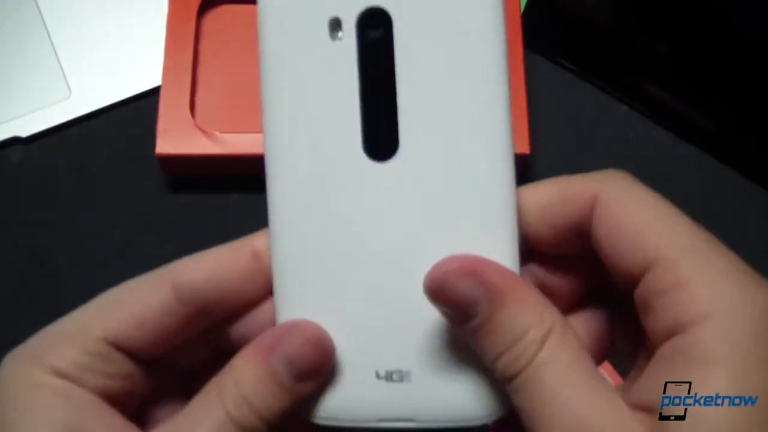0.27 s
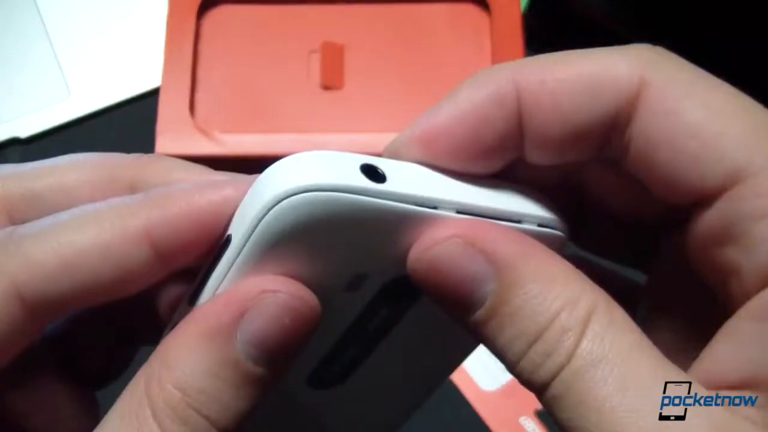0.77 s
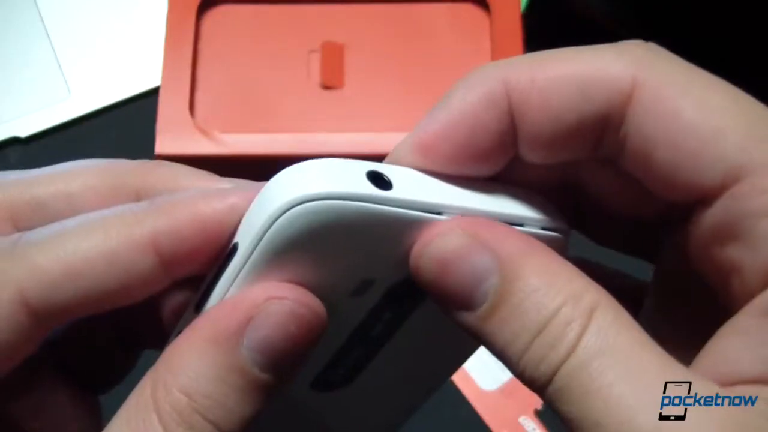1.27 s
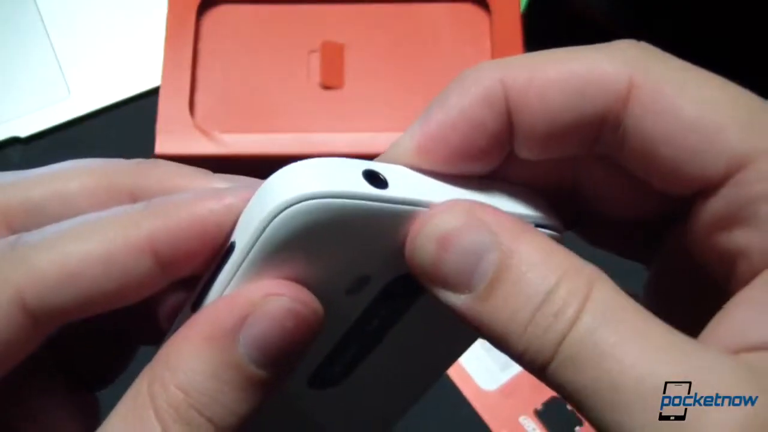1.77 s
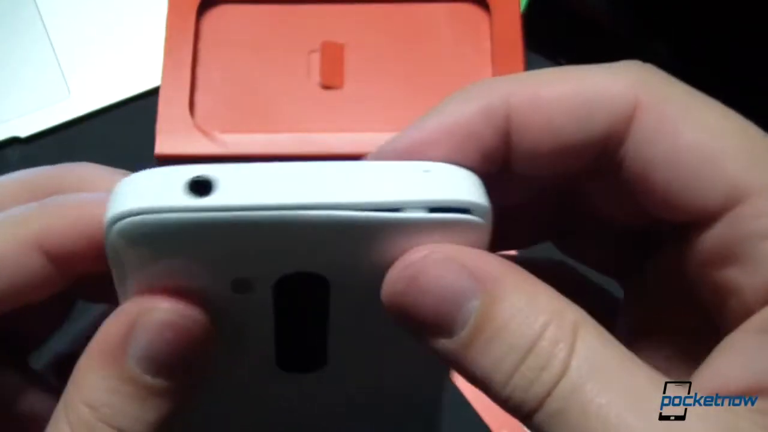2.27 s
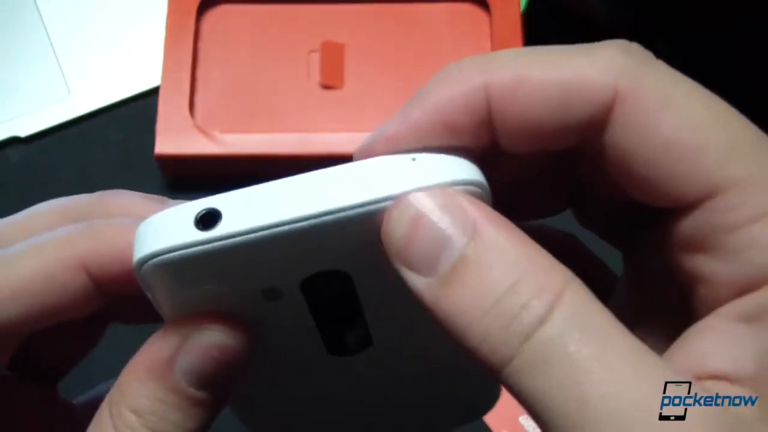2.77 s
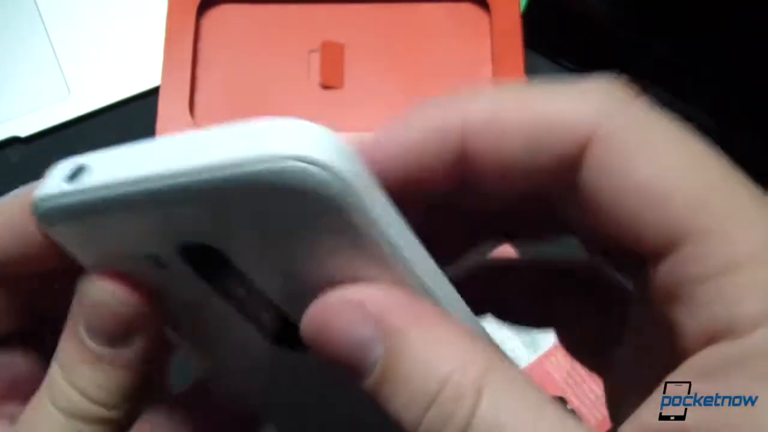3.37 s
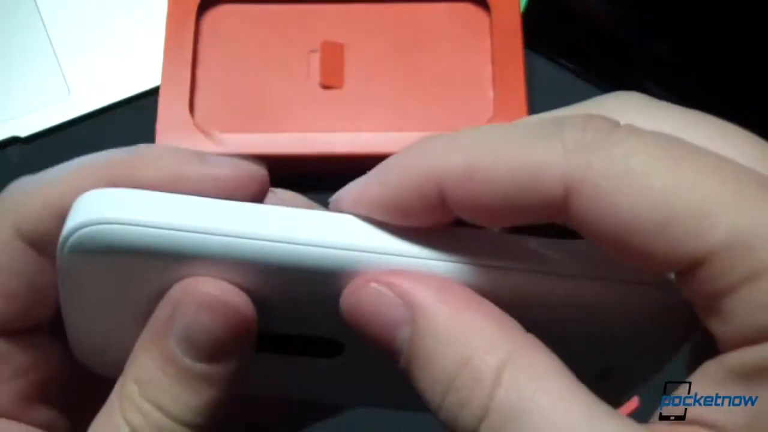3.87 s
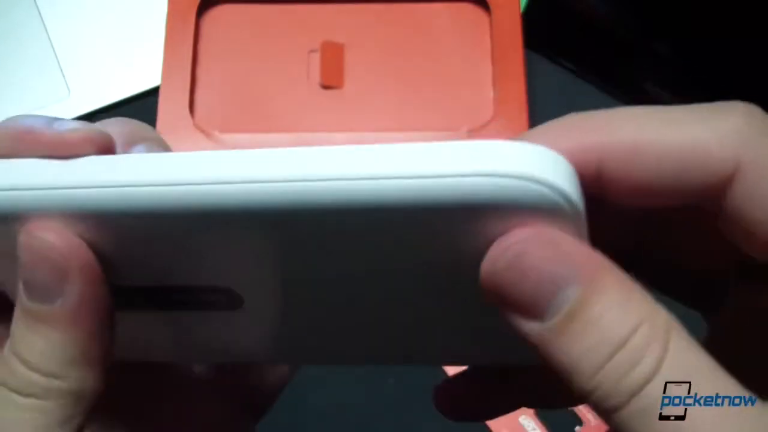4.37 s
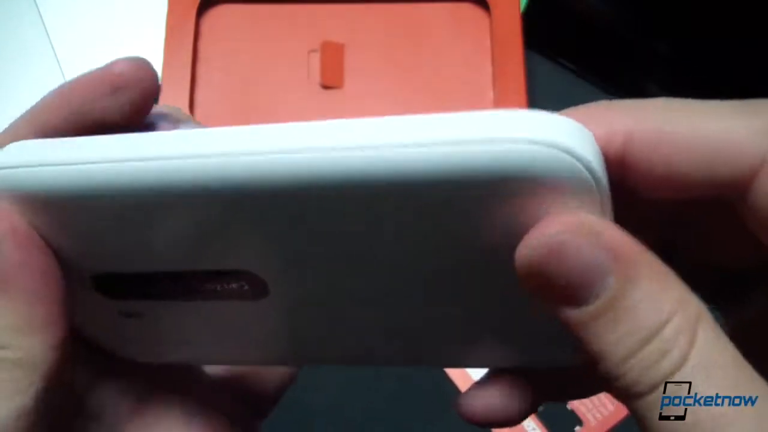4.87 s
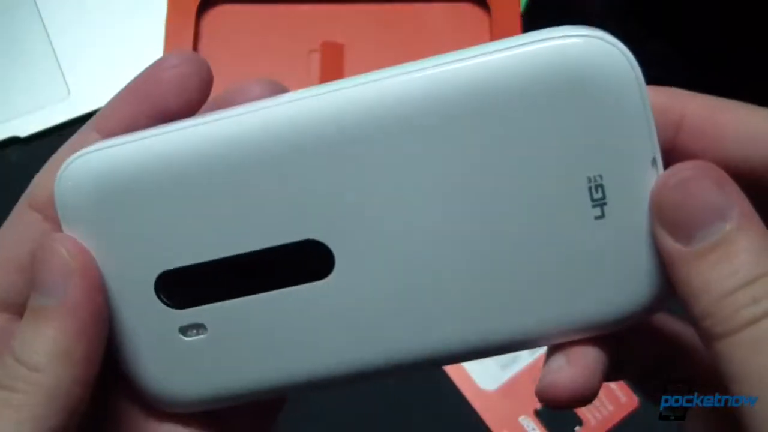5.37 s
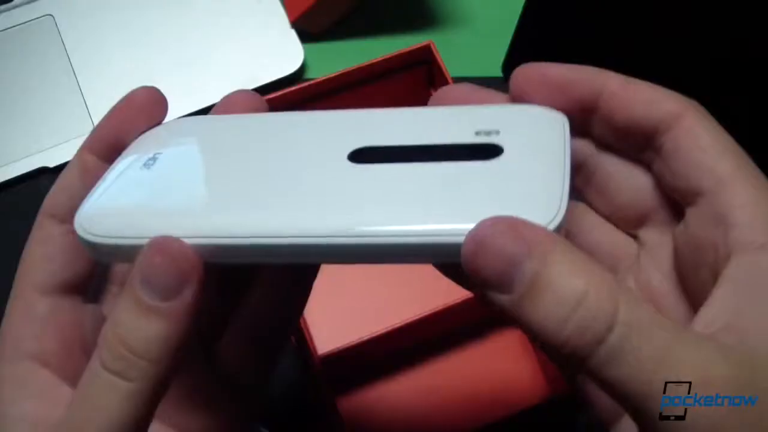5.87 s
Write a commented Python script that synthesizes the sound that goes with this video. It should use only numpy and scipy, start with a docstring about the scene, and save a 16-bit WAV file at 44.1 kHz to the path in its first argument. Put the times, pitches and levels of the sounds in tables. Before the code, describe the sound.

Three sharp plastic snaps of a phone cover seating under the thumbs, with faint ticks, soft finger bumps and a low hum between.

```python
"""Three catches of a plastic back cover slip and snap home on a phone: modes of the cover ring under noise cracks.
Between the snaps the shell ticks and creeps, exciting the same modes more softly, and a side key clicks.
Fingers slide, as noise grained by tiny slips, and bump, as low thuds; a small, dry room answers by convolution.
Beneath lie a wavering low hum, a brief drone and faint steady noise; the loudest peaks are rounded off."""
import sys
import numpy as np
from scipy import signal
from scipy.fft import rfft, irfft, next_fast_len
from scipy.io import wavfile
from scipy.ndimage import uniform_filter1d, map_coordinates

SR = 44100
rng = np.random.default_rng(int(sys.argv[2]) if len(sys.argv) > 2 else 0)


def dump_mix(stems):
    """Bounce the given channels to the path in sys.argv[1] as a 16-bit WAV at rate SR."""
    frames = np.atleast_2d(stems).T  # one column per channel
    limited = np.clip(frames, -1, 1)  # hard clip at full scale
    pcm = np.round(limited * 32767).astype(np.int16)
    wavfile.write(sys.argv[1], SR, pcm)


N = 269671  # length in samples


def amp(db):
    """Level law: decibels to amplitude gain."""
    return 10 ** (np.asarray(db) / 20)


def unit(x):
    """Normalisation: scale to an rms of 1."""
    return x / np.sqrt(np.mean(x ** 2) + 1e-20)


def fade(t, t60):
    """Exponential damping: a decay by 60 dB in t60 seconds."""
    return np.exp(-np.log(1000) * t / t60)


def along(points, hz):
    """Logarithmic frequency scale: read (Hz, value) points by interpolation."""
    f, v = np.transpose(points)
    return np.interp(np.log(hz + 1), np.log(f), v)


def noise(spectrum, size):
    """Spectral shaping: white noise coloured by a spectrum in dB, at an rms of 1."""
    hz = np.fft.rfftfreq(size, 1 / SR)
    shaped = rfft(rng.standard_normal(size)) * amp(along(spectrum, hz))
    return unit(irfft(shaped, size))


def burst(spectrum, t, t60):
    """High modal density: a dense cluster of struck modes is heard as decaying noise."""
    return noise(spectrum, len(t)) * fade(t, t60)


def wobble(rate):
    """Slow random modulation: a smooth curve through random knots, rate of them a second."""
    knots = rng.standard_normal(200)
    return map_coordinates(knots, [np.arange(N) * rate / SR], mode="mirror")


def add(track, s, sound):
    """Superposition: mix a sound into the track at s seconds."""
    start = max(round(s * SR), 0)
    track[start:start + len(sound)] += sound[:len(track) - start]


# Levels of the low hum before a common trim. Each row: time in seconds, level in dB.
HUM_LEVELS = [(0.0, -55), (1.53, -52), (1.92, -57.5), (2.87, -55.5), (3.11, -67), (3.25, -50.5),
              (3.59, -47.5), (4.81, -58.5), (5.48, -53), (6.11, -55.5)]
# Spectrum of the steady noise, strongest in the bass. Each row: frequency in Hz, relative level in dB.
AIR_SPECTRUM = [(12, -6), (38, -4.5), (56, -12), (100, -14), (200, -22), (330, -24.5), (550, -30),
                (1200, -33.5), (1500, -38), (3500, -42), (15000, -47)]
DRONE_START_S, DRONE_END_S, DRONE_FADE_S, DRONE_DB = 5.6, 6.03, 0.087, -60.5


def background(hum_hz=25.8, drone_hz=91, air_db=-61, hum_db=-0.74, waver=0.44, flutter_db=1.3):
    """Phase and amplitude modulation make a low hum waver, beside a brief drone and steady noise."""
    time = np.arange(N) / SR
    level_db = np.interp(time, *np.transpose(HUM_LEVELS)) + hum_db + flutter_db * wobble(9)
    phase = 2 * np.pi * hum_hz * time + waver * wobble(3.2)  # waver in radians
    hum = amp(level_db) * unit(np.sin(phase))
    swell = np.clip(np.minimum(time - DRONE_START_S, DRONE_END_S - time) / DRONE_FADE_S, 0, 1)
    drone = amp(DRONE_DB) * swell * unit(np.sin(2 * np.pi * drone_hz * time))
    return hum + drone + amp(air_db) * noise(AIR_SPECTRUM, N)


# Reverberation of the small room. Each row: frequency in Hz, decay time t60 in seconds.
ROOM_DECAY = [(100, .07), (350, .07), (1000, .046), (2000, .045), (5000, .042), (14000, .031)]
# What the walls send back. Each row: frequency in Hz, relative level in dB.
WALL_REFLECTION = [(100, 0), (400, 1), (950, -7), (1500, -1), (5000, -1), (14000, -5)]


def room(x, delay=.004):
    """Convolution reverberation: desk and near walls answer after delay seconds, the treble dying first."""
    hz, t, bands = signal.stft(rng.standard_normal(SR // 4), SR, nperseg=256)
    decay = amp(along(WALL_REFLECTION, hz))[:, None] * fade(t, along(ROOM_DECAY, hz)[:, None])
    tail = signal.istft(bands * decay, SR, nperseg=256)[1]
    tail = tail / np.linalg.norm(tail)
    tail = np.pad(tail, (round(delay * SR), 0))
    return signal.fftconvolve(x, tail)[:N]


# Modes of the plastic cover. Each row: frequency in Hz, decay time t60 in seconds, then the
# relative level in dB when struck at the first, the second and the third catch.
COVER_MODES = [(125, .025, -23, -18, -18), (281, .045, -20, -38, -23), (341, .062, -17, -22, -21),
               (465, .038, -22, -22, -22), (680, .046, -22, -32, -40), (768, .048, -24, -25, -20),
               (938, .025, -18, -4, 0), (1025, .021, -24, -2, 1), (1167, .037, -12, -18, -13),
               (1306, .029, -6, -12, -9), (1460, .025, -7, -8, -14), (1736, .024, -3, -24, -20),
               (2050, .021, -9, -7, -8), (2350, .018, -16, -21, -12), (2732, .016, -17, -15, -13),
               (3247, .02, -13, -21, -21), (3530, .019, -16, -24, -12), (4050, .02, -12, -24, -22),
               (4490, .018, -27, -20, -14), (5400, .016, -30, -17, -14), (7070, .016, -11, -26, -22),
               (7570, .016, -18, -15, -26), (9800, .015, -13, -14, -19)]


def cover_modes(t, attack=.0009):
    """Modal decomposition: one damped sine per cover mode, neighbours starting in opposite directions."""
    hz, t60 = np.transpose(COVER_MODES)[:2, :, None]
    signs = (-1) ** np.arange(len(hz))[:, None]
    onset = 1 - np.exp(-t / attack)
    return signs * np.sin(2 * np.pi * hz * t) * fade(t, t60) * onset


def shell_ring(modes, centre_hz, spread):
    """Selective excitation: a light contact rings the modes around one centre, spread in octaves."""
    octaves = np.log2(np.transpose(COVER_MODES)[0] / centre_hz)
    weights = np.exp(-.5 * (octaves / spread) ** 2)
    scatter_db = rng.uniform(-3, 3, len(COVER_MODES))  # no two contacts alike
    return (weights * amp(scatter_db)) @ modes


# Spectrum of hard plastic contact. Each row: frequency in Hz, relative level in dB.
CRACK_SPECTRUM = [(200, -17), (1000, -7), (2600, 1), (4500, .5), (6000, -.5), (10000, -.5), (12500, -3.5),
                  (14500, -9), (16500, -14)]


def crack(t, t60):
    """Broadband impact: hard plastic contact is a short noise burst."""
    return burst(CRACK_SPECTRUM, t, t60)


# Clicks of a side key under the grip. Each row: start in seconds, level in dB.
KEY_CLICKS = [(3.463, -65), (3.584, -55), (4.358, -42), (4.3811, -56.5), (4.399, -64.5)]
# Modes of the key. Each row: frequency in Hz, relative level in dB, decay time t60 in seconds.
KEY_MODES = [(1610, -5, 0.022), (1870, -8.5, 0.034), (2480, -2, 0.02), (3393, -5.5, 0.018),
             (3957, 0.5, 0.02604), (4800, -7.5, 0.016), (5650, -7.5, .022), (6728.8, -10.5, 0.0231),
             (9741, -23, .022)]


def side_key(crack_db=-9.0, crack_t60=0.031):
    """Modal ringing of a small stiff body: the key knocks in its slot, with no modes in the bass."""
    out, t = np.zeros(N), np.arange(SR // 8) / SR
    ring = np.zeros(len(t))
    for k, (hz, db, t60) in enumerate(KEY_MODES):
        ring += (-1) ** k * amp(db) * np.sin(2 * np.pi * hz * t) * fade(t, t60)
    for s, db in KEY_CLICKS:
        add(out, s, amp(db) * (ring + amp(crack_db) * crack(t, crack_t60)))
    return out


CREEP_START_S, CREEP_STEP_S = .393, .0695
# first step, loss per step, centre of the excited modes
CREEP_DB, CREEP_LOSS_DB, CREEP_HZ = -66.5, 0.5, 1605


def creep(count=4, spread=.7, crack_db=-4, crack_t60=0.032):
    """Stick-slip friction: under steady pressure the cover creeps in even steps, its ticks fading."""
    out, t = np.zeros(N), np.arange(SR // 8) / SR
    modes = cover_modes(t)
    for k in range(count):
        tick = shell_ring(modes, CREEP_HZ, spread) + amp(crack_db) * crack(t, crack_t60)
        add(out, CREEP_START_S + k * CREEP_STEP_S, amp(CREEP_DB - k * CREEP_LOSS_DB) * tick)
    return out


# Single ticks of the shell. Each row: start in seconds, ring level in dB, centre of the excited modes
# in Hz, their spread in octaves, crack level in dB before its lowpass, lowpass corner in Hz.
SHELL_TICKS = [(.496, -70, 3800, .6, -63, 11000), (2.05, -67, 5500, 0.55, -63.5, 10000),
               (2.231, -65, 2600, 0.6, -63, 5992), (2.511, -48.5, 1800, 1.1, -47.5, 6200),
               (2.7932, -55.5, 598, 1.1, -65, 12000), (2.818, -54.5, 905, 0.9086, -60.5, 12050),
               (3.057, -44.5, 1003, 0.19, -54, 13000), (3.068, -60.5, 4800, 0.831, -53, 11000),
               (3.5615, -61.5, 2400, .8, -56, 13000), (5.897, -65.5, 2400, 0.65, -70, 6000)]


def ticks(crack_t60=0.024):
    """Contact stiffness: as the shell shifts under the thumbs, each contact has its own ring and crack band."""
    out, t = np.zeros(N), np.arange(SR // 8) / SR
    modes = cover_modes(t)
    for s, ring_db, centre_hz, spread, crack_db, top_hz in SHELL_TICKS:
        softness = signal.butter(4, top_hz, fs=SR, output="sos")
        soft_crack = signal.sosfilt(softness, crack(t, crack_t60))
        add(out, s, amp(ring_db) * shell_ring(modes, centre_hz, spread) + amp(crack_db) * soft_crack)
    return out


# Soft bumps of the hands on the phone. Each row: start in seconds, level in dB before onset and decay.
HAND_BUMPS = [(.44, -55), (.713, -61), (2.14, -52), (2.509, -55.5), (3.056, -57), (3.52, -47.5),
              (3.564, -45.5), (3.67, -49), (4.865, -51)]


def bumps():
    """Soft impact: a yielding fingertip lands slowly and excites mainly the bass."""
    out, t = np.zeros(N), np.arange(SR // 3) / SR
    for s, db in HAND_BUMPS:
        thud = burst([(25, -14.0), (65, 6), (160, -10), (400, -25.5), (1500, -53)], t, t60=.13)
        onset = 1 - np.exp(-t / 0.002)
        add(out, s, amp(db) * thud * onset)
    return out


# Slides of a finger over the shell. Each row: time of the catch in seconds, rise (Gaussian width)
# in seconds, pressure level at the catch in dB.
FINGER_SLIDES = [(.335, 0.029, -71.5), (.459, 0.006127, -61.5), (.712, 0.017, -73), (2.007, .012, -63),
                 (2.039, 0.005935, -64), (3.028, .01, -62.5), (3.376, 0.024, -66.5), (3.668, 0.009, -73),
                 (4.189, 0.013, -62.5), (4.865, 0.046, -74.5), (6.09, .07, -76)]
# Spectrum of skin on plastic. Each row: frequency in Hz, relative level in dB.
SKIN_SPECTRUM = [(200, -4), (650, -10), (1000, 4.5), (2500, 3), (7000, -2), (12000, -5.5), (16000, -9)]
# Gaussian width of the slide's dying; the tick at the catch: level relative to the slide, mode centre
SLIDE_RELEASE_S, CATCH_DB, CATCH_HZ = 0.009889, -3, 1610


def slides(grain_db=3.5, catch_spread=1.0, rest_db=-89, restless_db=4):
    """Granular friction: skin slides in tiny slips, pressed harder until it catches with a tick."""
    time, t = np.arange(N) / SR, np.arange(SR // 3) / SR
    modes = cover_modes(t)
    pressure = amp(rest_db + restless_db * wobble(5))  # the grip is never quite still
    for s, rise_s, db in FINGER_SLIDES:
        width = np.where(time < s, rise_s, SLIDE_RELEASE_S)
        pressure = pressure + amp(db) * np.exp(-.5 * ((time - s) / width) ** 2)
    grain = unit(uniform_filter1d(rng.standard_normal(N), size=90))  # smoothed over 2 ms
    slips = unit(amp(grain_db * grain))
    out = pressure * slips * noise(SKIN_SPECTRUM, N)
    for s, _, db in FINGER_SLIDES:
        add(out, s, amp(db + CATCH_DB) * shell_ring(modes, CATCH_HZ, catch_spread))
    return out


# The three catches. Each row: snap time in seconds, ring gain in dB, crack gain in dB, lead of the slip
# in seconds, slip gain in dB, metal ring gain in dB.
CATCHES = [(.0538, -.5, -8.5, .006, -38, -72), (1.7594, 0, -11, .004, -47, -63),
           (2.8272, .5, -10, .0022, -36, -64)]
# Spectrum of the catch scraping over its lip. Each row: frequency in Hz, relative level in dB.
SLIP_SPECTRUM = [(200, -14), (900, -8), (1900, 2), (3000, -8), (7000, -16.5), (16000, -24)]
# Modes of a small metal part inside. Each row: frequency in Hz, relative level in dB, t60 in seconds.
METAL_MODES = [(2830, -5.5, .22), (6537, -3, .25), (6400, 1.5, .2)]
# Rebounds of the cover on its seat. Each row: start in seconds, level in dB.
SEAT_REBOUNDS = [(0.0561, -10.5), (0.0622, -17.5), (0.0702, -33.5), (1.762, -7.5), (1.766, -25.5),
                 (2.8306, -15)]


def snaps(hold=0.0027, crack_t60=0.012, rebound_t60=0.0057, slip_t60=0.055, impact_db=0, impact_t60=0.0022):
    """Sudden release: each catch scrapes over its lip and lets go; the cover cracks, rings and rebounds."""
    out, t = np.zeros(N), np.arange(SR // 3) / SR
    modes = cover_modes(t)
    metal = sum(amp(db) * np.sin(2 * np.pi * hz * t) * fade(t, t60) for hz, db, t60 in METAL_MODES)
    strike_levels = np.transpose(COVER_MODES)[2:]  # one set of mode levels per catch
    for (s, ring_db, crack_db, lead, slip_db, metal_db), mode_db in zip(CATCHES, strike_levels):
        add(out, s - lead, amp(slip_db) * burst(SLIP_SPECTRUM, t, slip_t60))
        impact = amp(impact_db) * crack(t, impact_t60)
        # the catch chatters at full level for the hold in seconds, then dies away
        chatter = crack(np.maximum(t - hold, 0), crack_t60)
        ring = amp(ring_db + mode_db) @ modes
        add(out, s, amp(crack_db) * (impact + chatter) + ring + amp(metal_db) * metal)
    for s, db in SEAT_REBOUNDS:
        add(out, s, amp(db) * crack(t, rebound_t60))
    return out


def scene(room_db=-24):
    """Superposition: the phone in the hands, the room's answer and the background."""
    phone = side_key() + creep() + ticks() + bumps() + slides() + snaps()
    return (phone + amp(room_db) * room(phone) + background())[None]


def record(dry):
    """Saturation and band limiting: the recorder rounds off loud peaks, then cuts the top treble."""
    top, hardness = .93, 6  # ceiling as a share of full scale; sharpness of the bend
    top_hz, slope_hz = 16200, 800  # centre and width of the cutoff
    squashed = dry / (1 + np.abs(dry / top) ** hardness) ** (1 / hardness)
    size = next_fast_len(N + SR // 2)
    hz = np.fft.rfftfreq(size, 1 / SR)
    lowpass = np.clip((top_hz - hz) / slope_hz + .5, 0, 1)
    return irfft(rfft(squashed, size) * lowpass, size)[:, :N]


dry = scene()
out = record(dry)
dump_mix(out)
```